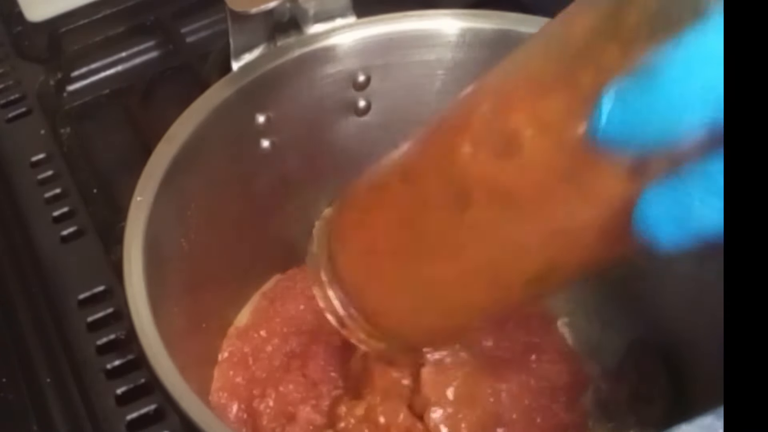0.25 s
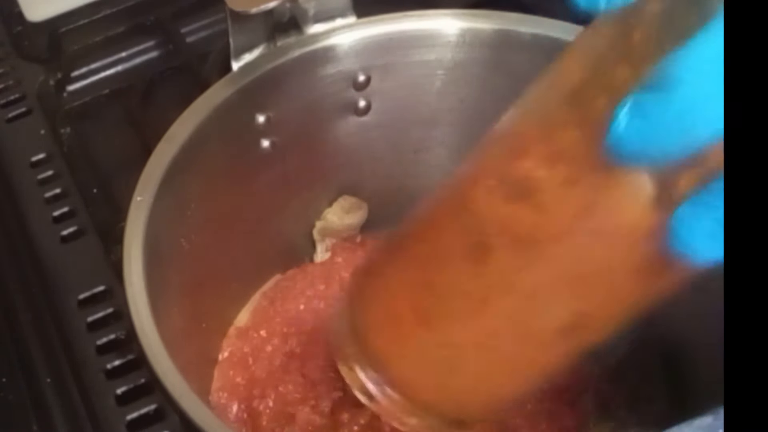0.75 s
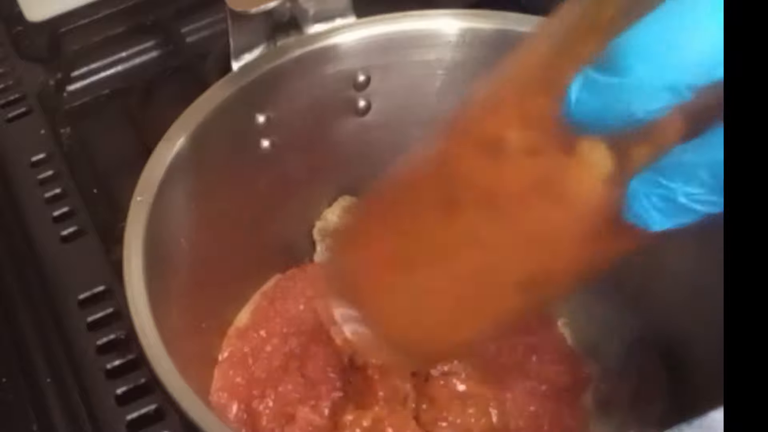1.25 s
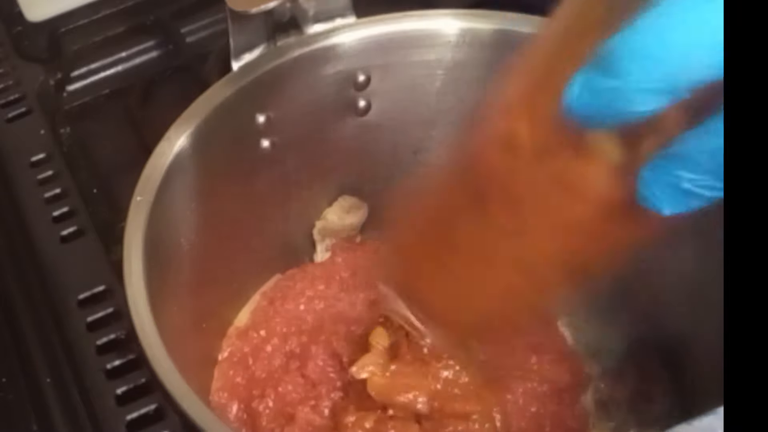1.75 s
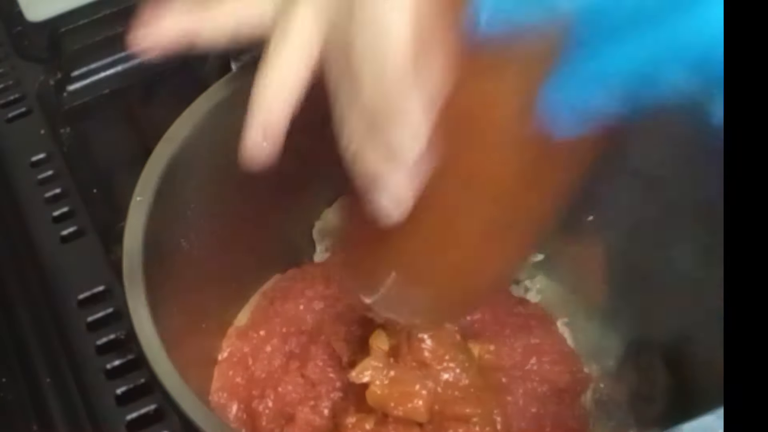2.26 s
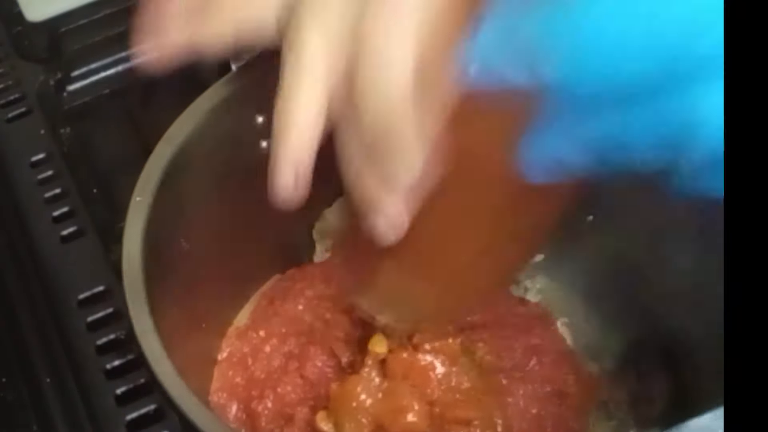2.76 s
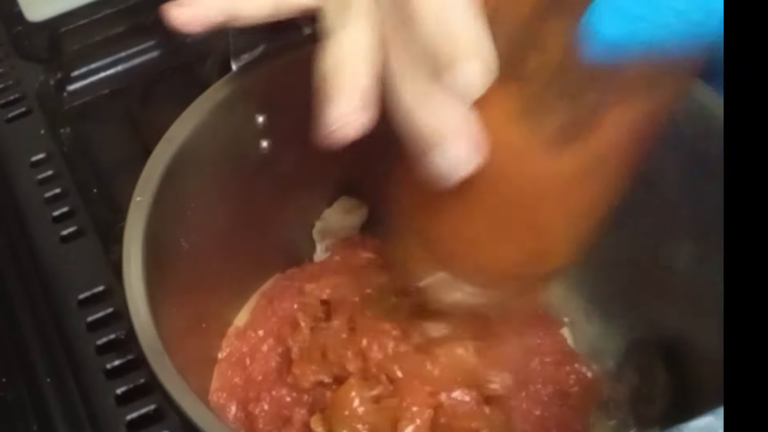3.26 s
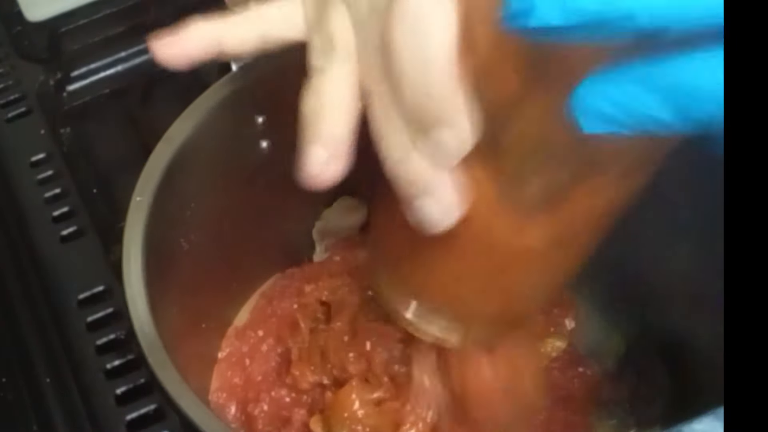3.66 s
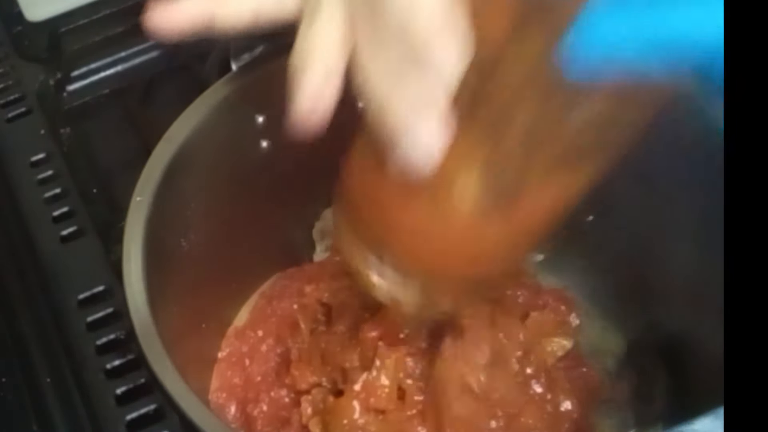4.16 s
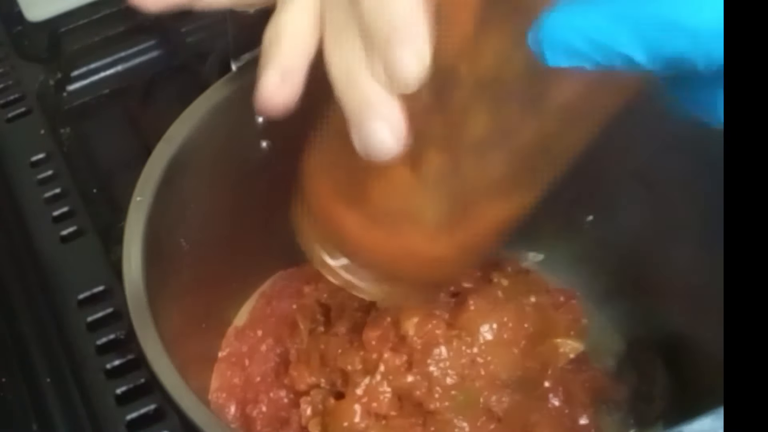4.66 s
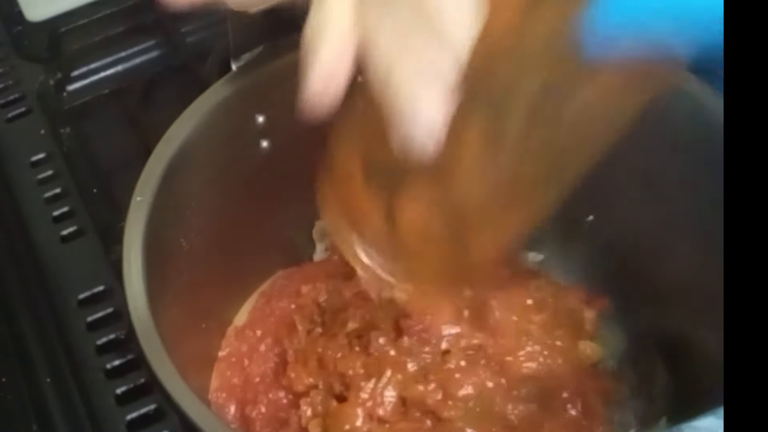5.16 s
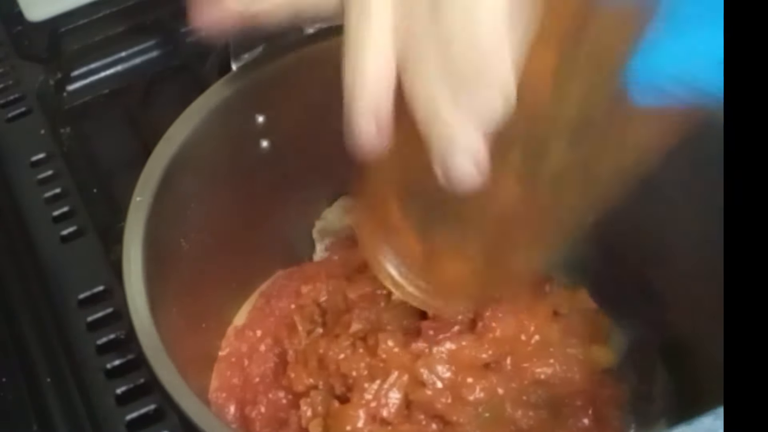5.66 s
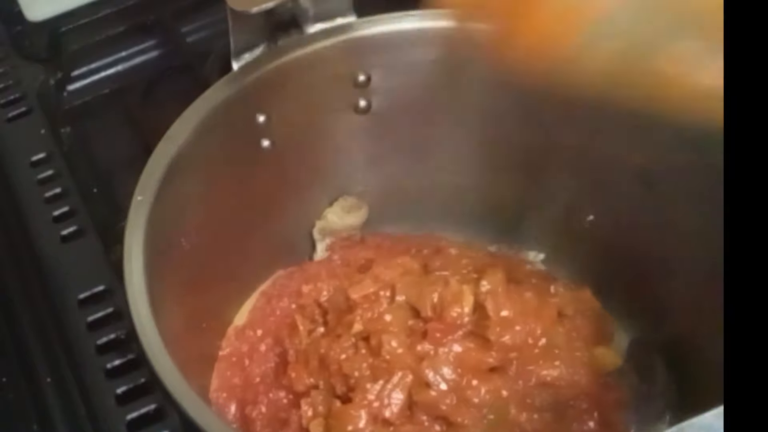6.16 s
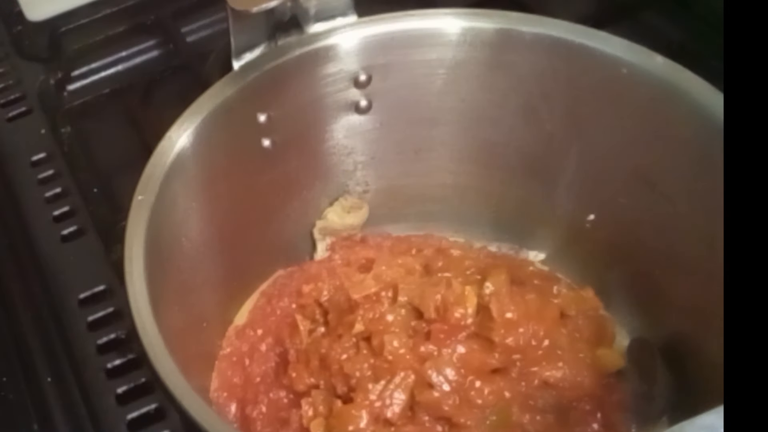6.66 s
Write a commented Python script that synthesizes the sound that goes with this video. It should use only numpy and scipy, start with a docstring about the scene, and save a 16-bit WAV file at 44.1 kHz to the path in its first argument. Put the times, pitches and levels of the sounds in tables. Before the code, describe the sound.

Quiet sizzling and bubble pops in a steel pot, then thick sauce shaken from a glass jar in wet squelching splats with dull thumps.

```python
"""Thick tomato sauce is shaken out of a glass jar into a hot steel pot. Each shake throws out a squelching
splat, made of crowds of tiny air-pocket notes and wet hiss, and falling lumps thump the heap.
Bubbles plop and slurp as short rising notes, droplets spit in chirps and puffs of noise, and the hot pot
sizzles. The air column and walls of the pot ring as resonances, and a small kitchen answers."""
import sys
import numpy as np
from scipy import signal
from scipy.fft import rfft, irfft, next_fast_len
from scipy.io import wavfile
from scipy.ndimage import map_coordinates

SR = 44100
rng = np.random.default_rng(int(sys.argv[2]) if len(sys.argv) > 2 else 0)


def waveform_to_disk(signal):
    """Save audio, clipped to [-1, 1], as 16-bit WAV at the path in sys.argv[1]."""
    frames = np.transpose(np.atleast_2d(signal))
    scaled = np.clip(frames, -1, 1) * 32767
    samples = np.round(scaled).astype(np.int16)
    wavfile.write(sys.argv[1], SR, samples)


N = 305172  # length in samples

# Shakes of the jar, each throwing out a splat. Each row: time in seconds, level in dB before each layer's
# own trim, bright centre in Hz, then jar mouth, first squirt and dribble in dB relative to that level.
SHAKES = [(2.9129, -22.5, 4203, -14, -2.5, -1.5), (2.993, -21, 4990, -3.5, -23, -40),
          (3.0818, -15, 3436, -15, -11.5, -12), (3.14, -28.5, 5500, 0.5, -16, -13.5),
          (3.3204, -36, 4700, -6, -29, -30.5), (3.426, -24.5, 4070, 0.5, -38.5, -9),
          (3.573, -27.5, 5570, 0, -50, -3), (3.762, -16.5, 4024, -16.5, -64.5, -16),
          (3.922, -16.5, 4486, -21, -11.5, -16), (4.075, -19.5, 4570, -7, -18, -5.5),
          (4.242, -21.5, 3420, -7.5, -43, -4), (4.286, -26, 4990, -11, -36, -3),
          (4.437, -18.5, 5090, -18, -16, -22), (4.602, -28, 5440, -14, -14, -33),
          (4.626, -23.5, 6400, -30, -35, -40), (4.782, -20, 5870, -17, -46, -41),
          (4.9084, -35.5, 5090, -19, -35, -2)]
TOP_HZ = 15870  # band limit
TEAR_SPREAD_HZ = 1222  # scatter of the tearing pockets around their centre
LOUDEST_TICK = 2.4  # cap on the random loudness of ticks and snaps, before scaling to dB


def amp(db):
    """Turn decibels into a plain multiplier."""
    return 10 ** (np.asarray(db) / 20)


def unit(x):
    """Scale a sound to an average (RMS) level of one."""
    return x / np.sqrt(np.mean(x ** 2) + 1e-20)


def along(points, hz):
    """Read a curve of (Hz, value) points, with pitch on a log axis."""
    f, v = np.transpose(points)
    return np.interp(np.log(hz + 1), np.log(f + 1), v)


def curves(rows):
    """Draw one value per sample for each column after the time."""
    s, *columns = np.transpose(rows)
    return [np.interp(np.arange(N) / SR, s, column) for column in columns]


def wobble(rate):
    """A smooth random curve with this many knots a second."""
    knots = rng.standard_normal(int(N * rate / SR) + 4)
    return map_coordinates(knots, [np.arange(N) * rate / SR])


def filtered(x, response):
    """Multiply the spectrum of x by a response that depends on frequency."""
    m = next_fast_len(N + SR // 2)
    return irfft(rfft(x, m) * response(np.fft.rfftfreq(m, 1 / SR)), m)[..., :N]


def grains(s, hz, t60, size, length, climb=0.0, soft=0.0015):
    """Dying sine notes that swell over a share (soft) of their life; a closing bubble climbs in pitch."""
    t = np.arange(length) / SR
    s, hz, t60, size = (np.ravel(v)[:, None] for v in np.broadcast_arrays(s, hz, t60, size))
    hz = np.clip(hz, 30, SR / 2.5)
    shape = amp(-60 * t / t60) * (1 - np.exp(-t / (soft * t60)))
    wave = size * shape * np.sin(2 * np.pi * hz * t * (1 + climb * np.minimum(t / t60, 1)))
    at = np.clip(np.round(s * SR).astype(int), 0, N) + np.arange(length)
    return np.bincount(at.ravel(), wave.ravel(), N + length + 1)[:N]


def swarm(s, db, hz, rise, t60, spread, cycles, count, length, order=8, peak=0.0):
    """Air pockets burst in a crowd that swells and thins out; a few cavities (order) reopen again and again."""
    crowd, cavities = (len(s), count), (len(s), order)
    when, size, drift = rng.random(crowd), rng.standard_normal(crowd), rng.standard_normal(crowd)
    # pitch steps from low to high, for cavities from large to small
    steps = np.sqrt(12) * ((np.arange(order) + rng.random(cavities)) / order - .5)
    pitch, fill = np.array([steps, rng.standard_normal(cavities)])[..., np.arange(count) % order]
    t = (2 * rise + .6 * t60) * when
    after = np.maximum(t - 2 * rise, 0) / t60
    fade = amp(-60 * after) + peak * amp(-400 * after)  # peak adds a quick early burst
    swell = np.minimum(t / (2 * rise), 1) ** 2 * fade
    f = hz * np.exp(spread * pitch + 0.022 * drift)
    level = amp(db + 3.8 * size + 4.65 * fill) * swell
    return grains(s - rise + t, f, cycles / f, level, length=length, climb=0.029, soft=0.04)


def puffs(s, db, t60, hz, rise=.004, narrow_db=14):
    """Short breaths of steam: noise around hz that swells from each time and dies away."""
    starts = np.bincount(np.round(np.ravel(s) * SR).astype(int), amp(np.ravel(db)), N)
    t = np.arange(SR // 5) / SR
    breath = amp(-60 * t / t60) * (1 - np.exp(-(t / rise) ** 2))
    envelope = signal.fftconvolve(starts, breath)[:N]
    noise = rng.standard_normal(N)
    return envelope * unit(filtered(noise, lambda f: amp(-narrow_db * np.log((f + 1) / hz) ** 2)))


def ringing(x, ring_db, modes):
    """The direct sound plus resonances, each given as pitch in Hz, width in Hz and level in dB."""
    def ring(f):
        return sum(amp(db) * 1j * f * w / (c * c - f * f + 1j * f * w) for c, w, db in modes)
    return filtered(x, lambda f: 1 + amp(ring_db) * ring(f))


def in_pot(x, ring_db):
    """The air column in the pot rings along with a sound."""
    # Each row: resonance in Hz, width in Hz, level in dB before ring_db.
    air_modes = [(513, 157, -13.5), (941.5, 44, -1), (1443, 184, -4), (2107, 114, -5)]
    return ringing(x, ring_db, air_modes)


def pot_walls(x, count=45):
    """The steel walls ring at a few set notes and a thicket of random, mostly higher ones."""
    # Each row: resonance in Hz, width in Hz, level in dB before the -0.5 dB below.
    steel = [(964, 20, -3.5), (1988, 22, -0.5), (2146, 15.5, 0.5), (2340, 24, -1.5), (2483, 47, -3.5),
             (2704, 43, -3), (3300, 37, -1), (4540, 16, -25)]
    hz = np.geomspace(3600, 11000, num=count) * np.exp(.008 * rng.standard_normal(count))
    thicket = [(c, 35, -4 + 3 * rng.standard_normal()) for c in hz]  # 35 Hz wide, around -4 dB
    return ringing(x, -0.5, [*steel, *thicket])


def hush():
    """The quiet of the kitchen: steady noise with a fixed colour."""
    # Each row: frequency in Hz, relative level in dB per Hz.
    colour = [(12, -44), (20, 11.5), (942, -15), (1150, -37), (5470, -30), (15800, -4)]
    noise = rng.standard_normal(N)
    return amp(-62.0) * unit(filtered(noise, lambda hz: amp(along(colour, hz))))


def kitchen(x):
    """Each frequency of the room's answer dies at its own speed; moving hands keep changing it."""
    # Each row: frequency in Hz, time to fade by 60 dB in seconds.
    fade_times = [(150, 0.39), (1000, 0.17), (4000, 0.08), (12000, 0.051)]
    out, t = np.zeros(N), np.arange(N) / SR
    for phase in (0, np.pi / 2):  # the sound swings between two random answers
        hz, lag, z = signal.stft(rng.standard_normal(SR // 2), SR, nperseg=256)
        fade = amp(-60 * lag / along(fade_times, hz)[:, None])
        tail = signal.istft(z * fade, SR, nperseg=256)[1]
        part = x * np.cos(2 * np.pi * 1.5 * t + phase) ** 2
        late = np.pad(part, (200, 0))  # samples before the room answers
        out += signal.fftconvolve(late, tail / np.linalg.norm(tail))[:N]
    return out


def gurgle(count=800):
    """Small random bubbles of every size over a soft seethe, heard mostly through the air column."""
    # Each row: time in seconds, level in dB.
    simmer = [(0.0, -55.5), (0.6, -61), (0.83, -58), (1.0, -64), (1.52, -63), (2.75, -58.5), (3.08, -44),
              (3.26, -55.5), (3.89, -61), (4.86, -55), (5.07, -57.5), (6.34, -61), (6.63, -65.5),
              (6.92, -61)]
    # Colour of the seethe. Each row: frequency in Hz, relative level in dB per Hz.
    colour = [(35, -3), (60, 25.5), (944, -2), (1140, -25), (3500, 0), (4550, -16), (7700, -120)]
    s = rng.random((count, 1)) * N / SR
    pitch, size = rng.standard_normal((count, 1)), rng.standard_normal((count, 1))
    hz = 1100 * np.exp(0.62 * np.maximum(pitch, -1.4))
    bubbles = swarm(s, 5 * np.minimum(size, 1.3), hz, rise=0.00776, t60=.08, spread=0.15, cycles=10.3,
                    count=8, length=700, order=4)
    noise = rng.standard_normal(N) * amp(5 * wobble(22))  # wavers by about 5 dB
    seethe = filtered(noise, lambda f: amp(along(colour, f)))
    mix = unit(bubbles) + amp(3.0) * unit(seethe)
    return amp(curves(simmer)[0]) * unit(in_pot(mix, ring_db=30.0))


def ticks(count=1800):
    """Wet films snap: very short broad ticks in loose clumps of three."""
    s, loud = rng.random(count // 3) * (N / SR - .1), rng.exponential(size=(count // 3, 3))
    lag = 0.011 * rng.exponential(size=loud.shape)
    at = np.minimum(s[:, None] + lag, N / SR - .01)
    db = 15.5 * np.minimum(loud, LOUDEST_TICK)
    body = puffs(at, db, t60=0.054, hz=3900, rise=0.00014)
    edge = puffs(at, db, t60=0.0072, hz=10900, rise=0.000076)
    return unit(body + amp(10.0) * edge)


def crackle(hz, spread, cycles, count=1800):
    """Tiny drops snap on the steel: brief notes, a few of them much louder."""
    s, loud = rng.random(count) * N / SR, rng.exponential(size=count)
    f = np.minimum(hz * np.exp(spread * rng.standard_normal(count)), TOP_HZ)
    size = amp(4.5 * np.minimum(loud, LOUDEST_TICK))
    return unit(grains(s, f, cycles / f, size, length=400, soft=0.029))


def sizzle(count=450):
    """Wet spots fizz for a moment around a wandering pitch, with spray of finer and coarser drops."""
    # Steam on the steel. Each row: time in seconds, level in dB of the fizz, centre of the fizz in Hz.
    heat = [(0.0, -41, 5300), (0.13, -54, 6000), (0.35, -57, 4590), (0.63, -59.5, 5810),
            (1.19, -52.5, 5010), (1.6, -58.5, 5180), (2.1, -57, 5610), (2.75, -62, 5630), (2.95, -57, 4840),
            (3.15, -65, 4900), (3.78, -70, 5610), (3.99, -54, 4030), (4.63, -50.5, 5834), (5.36, -60, 5215),
            (5.92, -54, 5480), (6.42, -62, 5460), (6.76, -58.5, 5650), (6.8, -54.5, 5660),
            (6.92, -49, 6000)]
    level_db, centre_hz = curves(heat)
    at = rng.integers(0, N, (count, 1))
    pitch, size = rng.standard_normal((count, 1)), rng.standard_normal((count, 1))
    hz = centre_hz[at] * np.exp(.08 * pitch)
    fizz = swarm(at / SR, 2 * size, hz, rise=0.019, t60=0.25, spread=0.075, cycles=135,
                 count=30, length=600, order=10)
    noise = rng.standard_normal(N) * amp(4.7 * wobble(4.5))
    steam = unit(filtered(noise, lambda f: 1 / (1 + ((f - 5600) / 900) ** 2)))
    coarse_hz = 9200 * np.exp(.12 * pitch[-200:])
    coarse = swarm(at[:200] / SR, 9.5 * size[:200], coarse_hz, rise=0.02, t60=0.21, spread=0.087,
                   cycles=380, count=30, length=600, order=8)
    fine = puffs(at[-110:] / SR, 5 * size[-110:], t60=0.057, hz=15800, rise=0.0027)
    mix = unit(fizz) + amp(-5) * steam + amp(-15.0) * unit(coarse) + amp(-5.0) * unit(fine)
    mix += amp(-10.0) * in_pot(ticks(), ring_db=15.5)
    mix += amp(-13.5) * crackle(hz=3340, spread=0.393, cycles=71, count=5000)
    return amp(level_db) * mix


def slurps():
    """The heap sucks in large slow pockets with a grain of smaller ones on top."""
    # Each row: time in seconds, level in dB before trims, pitch in Hz, length in seconds before stretching.
    sucks = [(0.005, -49.5, 437, 0.089), (1.658, -49, 604, 0.14), (1.926, -53.5, 444, 0.048),
             (1.968, -47, 263, 0.13), (6.278, -36.5, 325, 0.084), (6.41, -43.5, 229, 0.1)]
    s, db, hz, span = np.transpose(sucks)[..., None]
    low = swarm(s, db - 4.5, hz, 0.0137, t60=2 * span, spread=0.21, cycles=8.3, count=30, length=2500)
    grain = swarm(s, db - 7.5, 950, 0.015, t60=4 * span, spread=0.46, cycles=7.8,
                  count=200, length=800, order=30)
    return low + grain


def plops():
    """A bursting bubble: a short rising note blurred by close neighbours and a puff of noise."""
    # The louder bubbles. Each row: time in seconds, level in dB before trims, pitch in Hz.
    bursts = [(0.09, -35.5, 880), (0.325, -28.5, 2540), (0.362, -33.5, 963), (0.434, -35.5, 2090),
              (0.505, -29.5, 1240), (0.599, -38.5, 2180), (0.918, -30, 1630), (0.994, -28.5, 2680),
              (1.382, -34.5, 890), (1.61, -40.5, 476), (1.691, -33, 2080), (1.973, -31, 2350),
              (2.044, -35, 2220), (2.196, -32.5, 1650), (2.474, -35.5, 930), (2.682, -37, 960),
              (2.753, -36.5, 900), (2.822, -32.5, 2000), (3.654, -34, 957), (3.804, -33.5, 890),
              (4.485, -32.5, 890), (4.803, -27, 4140), (4.902, -34, 1610), (4.92, -24.5, 2250),
              (4.988, -37, 920), (5.336, -32, 1304), (5.359, -35, 940), (5.443, -33, 910),
              (5.504, -25.5, 1343), (5.592, -33, 950), (5.678, -29, 933), (5.883, -28.5, 2700),
              (5.96, -33.5, 920), (6.113, -26, 2230), (6.431, -38, 956), (6.499, -35, 930),
              (6.646, -34, 1080)]
    s, db, hz = np.transpose(bursts)[..., None]
    pitch, lag = rng.standard_normal((len(s), 6)), rng.exponential(size=(len(s), 6))
    note = grains(s, hz, 35 / hz ** 1.01, amp(db - 7.5), length=2500, climb=0.053, soft=0.041)
    beside_hz, beside_size = hz * np.exp(.17 * pitch), amp(db - 13.0 - 6.0 * lag)
    beside = grains(s + 0.018 * lag, beside_hz, 16 / hz, beside_size, length=1500)
    return note + beside + puffs(s, db - 22.0, t60=0.034, hz=2750, rise=0.0017)


def spits():
    """A droplet flashes to steam on hot steel in a few quick chirps and two puffs of noise."""
    # The louder droplets. Each row: time in seconds, level in dB before trims, pitch in Hz.
    droplets = [(0.026, -35, 6160), (0.1278, -28.5, 3080), (0.295, -28, 3760), (0.325, -26, 3270),
                (0.6396, -33.5, 6000), (0.7878, -32.5, 5450), (0.844, -36.5, 2900), (0.885, -37, 3600),
                (1.011, -33, 6920), (1.233, -33.5, 6170), (1.321, -33, 4410), (1.3967, -33, 5000),
                (1.56, -34, 5770), (1.8749, -34, 5930), (1.9462, -31, 5920), (2.131, -35, 5600),
                (2.39, -28, 5960), (2.7638, -31, 5860), (3.58, -26, 6060), (3.867, -35, 8130),
                (4.128, -30.5, 10370), (4.219, -25, 5270), (4.453, -49, 10100), (5.217, -28.5, 4340),
                (5.268, -33, 5650), (5.454, -34.5, 5130), (5.522, -32, 6070), (5.862, -37, 6240),
                (6.5232, -44, 10340), (6.575, -36, 6100)]
    s, db, hz = np.transpose(droplets)[..., None]
    scatter = rng.standard_normal((len(s), 4))
    at = s + 0.00074 * abs(scatter[:, ::-1])
    chirps = grains(at, hz * np.exp(0.142 * scatter), 0.02, amp(db - 5.0), length=600, soft=0.035)
    bright_db = db + 12 * np.log(hz / 6500)  # finer droplets hiss more
    hiss = puffs(s, bright_db - 4.0, t60=0.019, hz=6300, rise=0.003)
    return chirps + hiss + puffs(s, bright_db - 9.0, t60=0.014, hz=14600, rise=0.0014)


def thumps():
    """Each lump rocks the loaded pot bottom and gives a dull rounded knock that crumbles away."""
    # Lumps landing on the heap. Each row: time in seconds, thud level in dB, thud note in Hz (the bottom's
    # modes nearest to it sound most), knock level in dB, knock note in Hz. Trims follow below.
    lumps = [(2.922, -24.5, 148, -20, 798), (3.006, -33, 150, -39, 450), (3.071, -47, 200, -26.5, 296),
             (3.087, -22.5, 145, -19, 823), (3.425, -48, 206, -38.5, 386), (3.442, -48, 168, -38.5, 470),
             (3.466, -28.5, 119, -49, 494), (3.58, -33.5, 146, -43, 420), (3.627, -32.5, 124, -40, 425),
             (3.761, -40, 144, -40, 448), (3.912, -70, 206, -38.5, 458), (3.931, -47, 169, -44, 346),
             (4.081, -56, 200, -40, 330), (4.255, -32.5, 207, -39.5, 412), (4.437, -38, 160, -34, 465),
             (4.607, -32.5, 133, -33.5, 398), (4.78, -57, 202, -42, 300), (4.798, -25, 168, -31, 386)]
    # Pot bottom under the sauce. Each row: mode in Hz, level in dB, time to fade by 60 dB in seconds.
    bottom = [(127.4, 0.5, 0.1), (166.6, 3, 0.045), (202, -3, 0.11), (256, -34, 0.011)]
    s, db, thud_hz, knock_db, knock_hz = np.transpose(lumps)[..., None]
    hz, mode_db, t60 = np.transpose(bottom)
    load = rng.standard_normal((2, len(s), len(hz)))  # the heap lies differently at each blow
    miss_db = 20.5 * abs(np.log(hz / thud_hz))  # loss of a mode away from the thud's note
    size = amp(db + mode_db + 0.82 * load[1] - miss_db)
    body = grains(s, hz * np.exp(load[0] / 30), t60, size, length=9000, soft=0.026)
    pitch, lag = rng.random((len(s), 60)), rng.exponential(size=(len(s), 60))
    crumb_hz = 1.298 * knock_hz * np.exp(-.9 * pitch)  # crumbs lie above and below the knock's note
    crumb_size = amp(knock_db - 13.5 - 3.35 * lag)
    knock = grains(s + 0.012 * lag ** 2, crumb_hz, 0.055, crumb_size, length=2200, soft=0.022)
    return body, knock


def mouth_hz(s):
    """Note of the jar mouth at these times, lower while sauce half plugs it."""
    # Each row: time in seconds, note in Hz.
    notes = [(2.9, 2630), (3.2, 2705), (3.42, 2008), (3.6, 2104), (3.76, 2620), (4.9, 2590)]
    return np.interp(s, *np.transpose(notes))


def drain():
    """Sauce keeps sliding: a thinner, longer crowd of pockets trails each splat, and the jar mouth hums on."""
    s, db, hz, mouth_db = np.transpose(SHAKES)[:4, :, None]
    t60 = 0.34  # seconds
    slide = swarm(s + .04, db - 32.5, hz, rise=0.013, t60=t60, spread=TEAR_SPREAD_HZ / hz, cycles=100,
                  count=300, length=420, order=12)
    hum_hz = .93 * mouth_hz(s)  # a little lower than during the splat
    hum = swarm(s + 0.046, db + mouth_db - 25.5, hum_hz, rise=0.025, t60=t60, spread=0.072, cycles=120,
                count=90, length=1500, order=4)
    return slide + hum


def spurts():
    """Each shake gives a first squirt, the splat, then a later and slightly lower dribble."""
    s, db, hz, mouth_db, squirt_db, dribble_db = np.transpose(SHAKES)
    squirt = (s - 0.022, db + squirt_db, hz, mouth_db)
    splat = (s, db, hz, mouth_db)
    dribble_pitch = 0.96  # factor on the bright centre
    dribble = (s + .027, db + dribble_db, hz * dribble_pitch, mouth_db)
    return np.concatenate([squirt, splat, dribble], axis=1)[..., None]


def rasp(s, db, hz):
    """Sauce hisses past the lip in narrow noise bands, strongest near the bright centre of each spurt."""
    hiss = np.zeros(N)
    for band_hz in np.geomspace(2400, 7000, num=5):
        band_db = db - 17 * np.log(hz / band_hz) ** 2  # quieter away from the centre
        hiss += puffs(s - .01, band_db, 0.098, band_hz, rise=.015, narrow_db=163)
    return hiss * amp(-15.5 + 3.3 * wobble(120))


def splats():
    """Bright pockets tear at the lip while larger ones sound the mouth of the jar, with hiss and fine spray."""
    s, db, hz, mouth_db = spurts()
    bright = swarm(s, db - 27.5, hz, rise=.011, t60=0.16, spread=TEAR_SPREAD_HZ / hz, cycles=117.0,
                   count=220, length=420, order=28, peak=4.2)
    mouth = swarm(s, db + mouth_db - 6.5, mouth_hz(s), rise=0.015, t60=0.12, spread=0.089, cycles=18,
                  count=70, length=1100, order=10, peak=1.0)
    spray = amp(7.1 * wobble(70)) * puffs(s - .01, db - 19.5, t60=0.12, hz=10800, rise=0.012)
    return bright + mouth + rasp(s, db, hz) + spray


def scene():
    """Ring the sounds through the pot's air and walls, then add the kitchen's answer and its hush."""
    body, knock = thumps()
    near = in_pot(splats() + drain() + spits(), ring_db=-33.0)
    near += in_pot(plops() + slurps(), ring_db=8.0)
    near += in_pot(knock, ring_db=4.0)
    near += body + sizzle() + gurgle()
    near = pot_walls(near)
    return (near + amp(-9.0) * kitchen(near) + hush())[None]


def record(dry, bass_hz=65):
    """A small microphone with a bass cut and a treble dip; nothing is kept above the band limit."""
    # Each row: frequency in Hz, gain in dB.
    tone = [(200, 5.5), (7000, -3.5), (10000, 0.5), (13500, -16.5), (15300, -6.5)]

    def response(hz):
        bass_cut = (1j * hz / (bass_hz + 1j * hz)) ** 3
        return bass_cut * amp(along(tone, hz)) * (hz < TOP_HZ)
    return filtered(dry, response)


dry = scene()
out = record(dry)
waveform_to_disk(out)
```